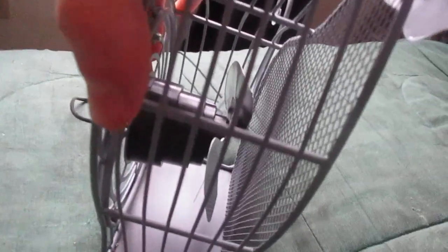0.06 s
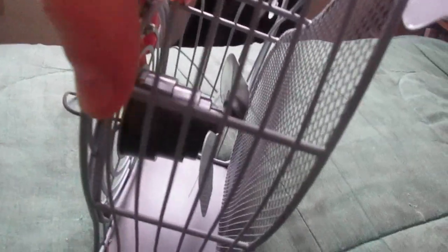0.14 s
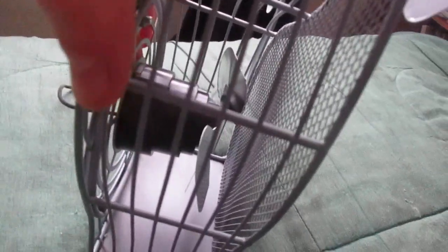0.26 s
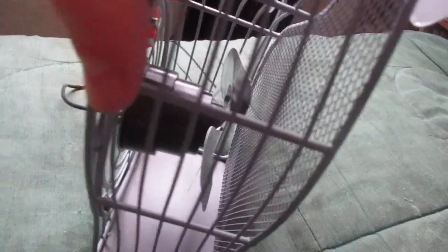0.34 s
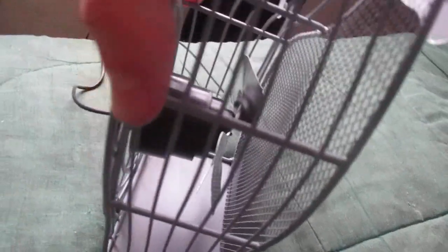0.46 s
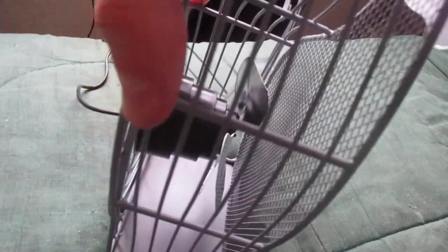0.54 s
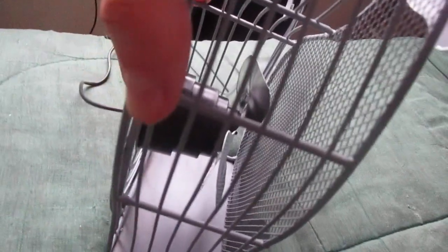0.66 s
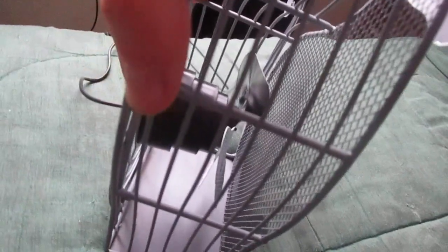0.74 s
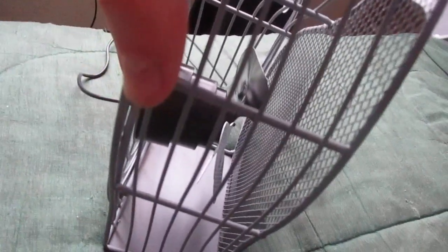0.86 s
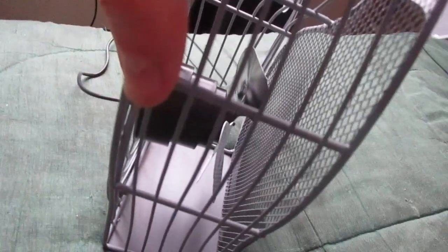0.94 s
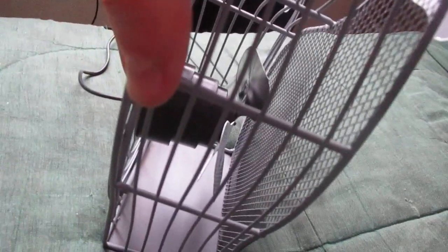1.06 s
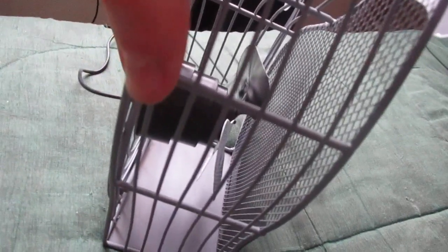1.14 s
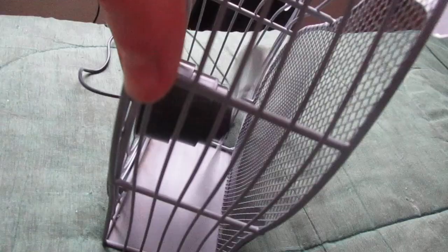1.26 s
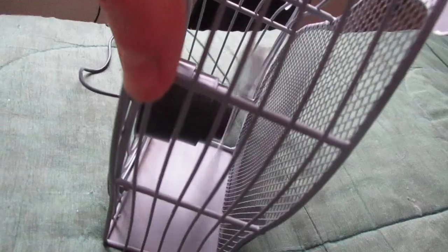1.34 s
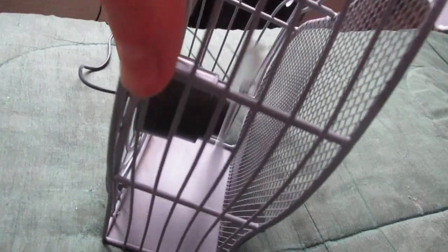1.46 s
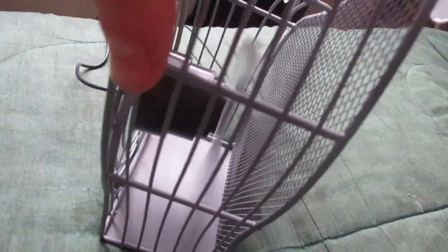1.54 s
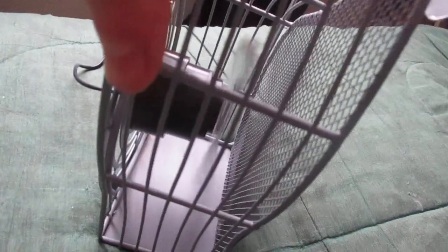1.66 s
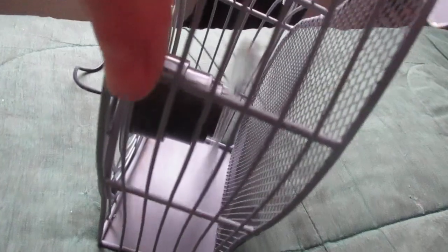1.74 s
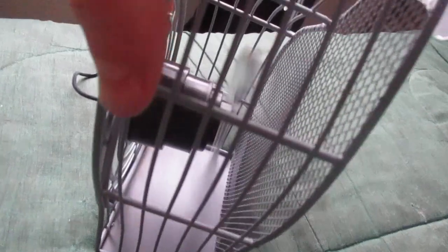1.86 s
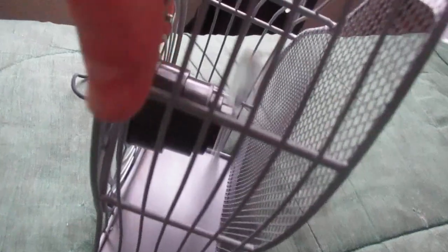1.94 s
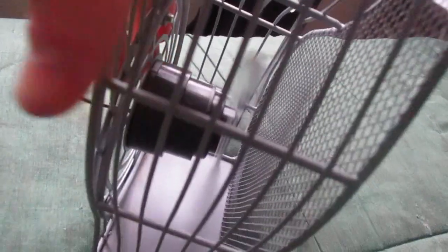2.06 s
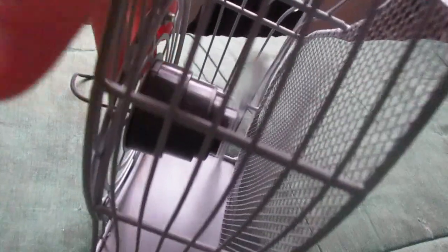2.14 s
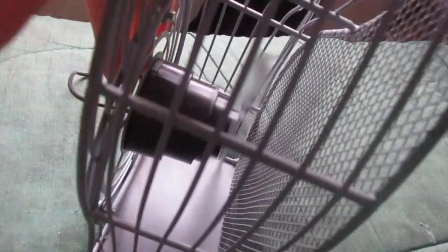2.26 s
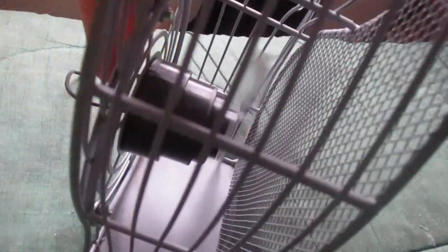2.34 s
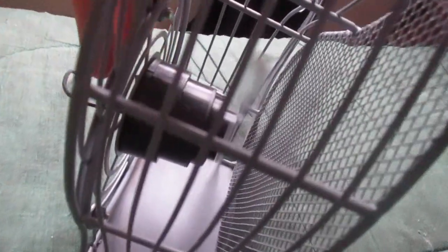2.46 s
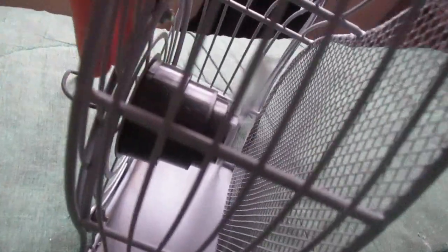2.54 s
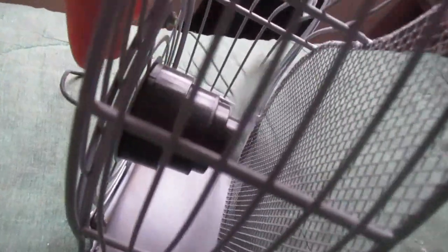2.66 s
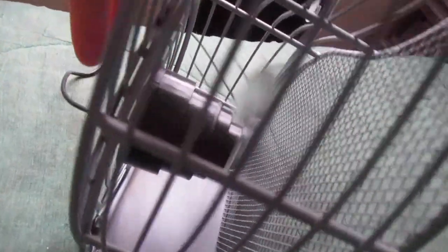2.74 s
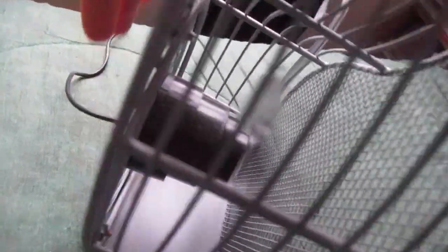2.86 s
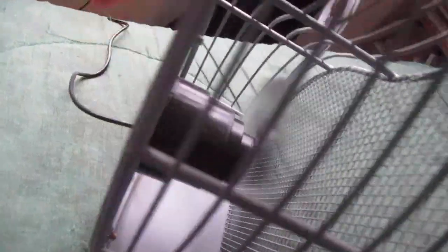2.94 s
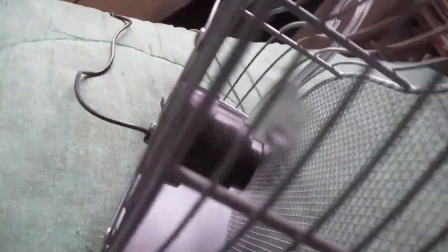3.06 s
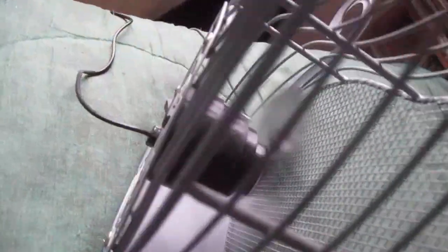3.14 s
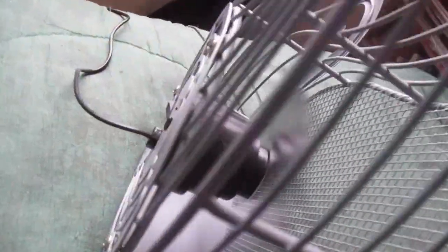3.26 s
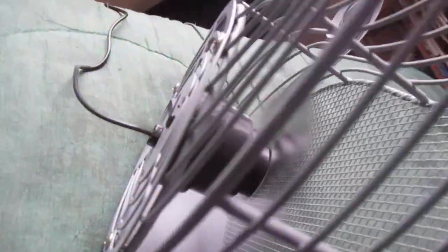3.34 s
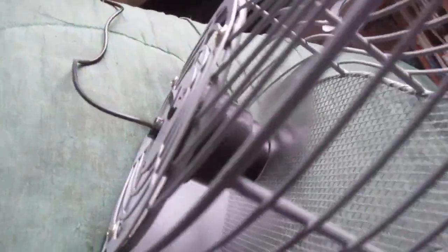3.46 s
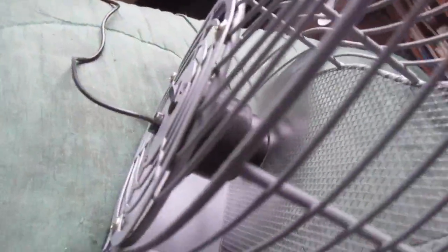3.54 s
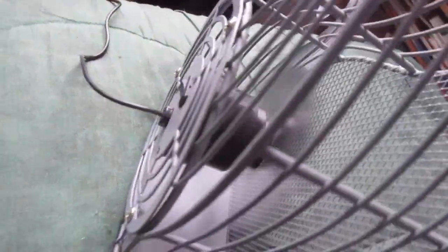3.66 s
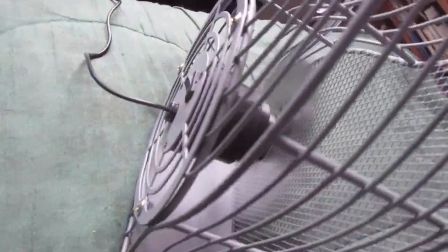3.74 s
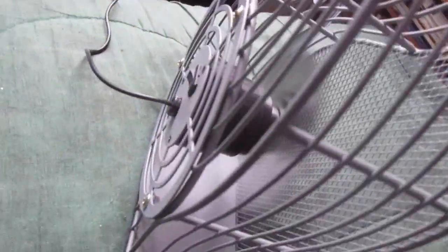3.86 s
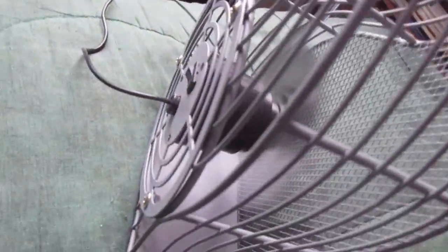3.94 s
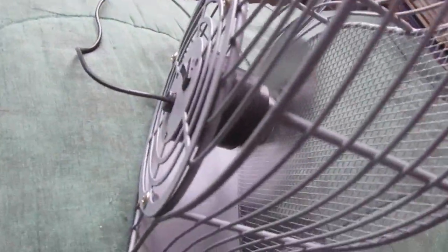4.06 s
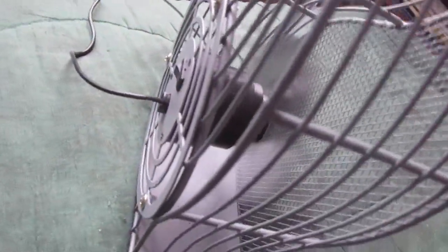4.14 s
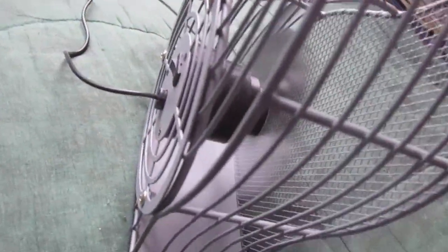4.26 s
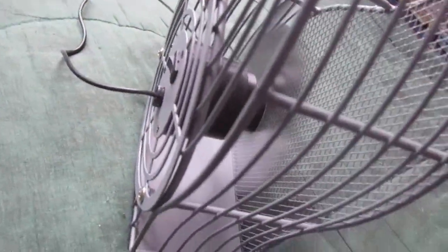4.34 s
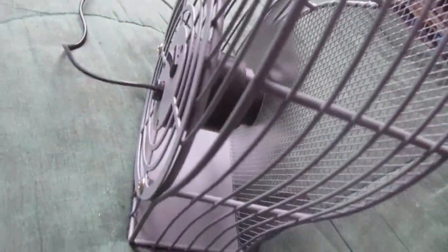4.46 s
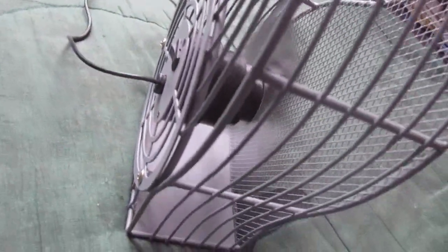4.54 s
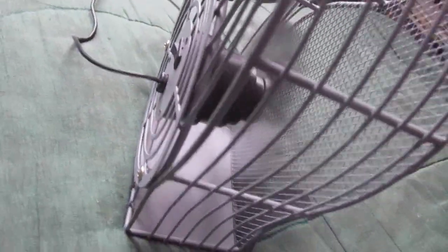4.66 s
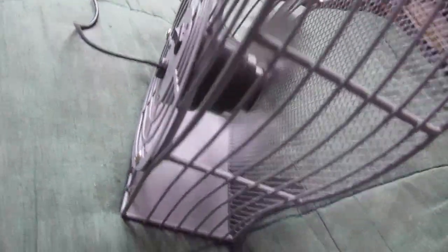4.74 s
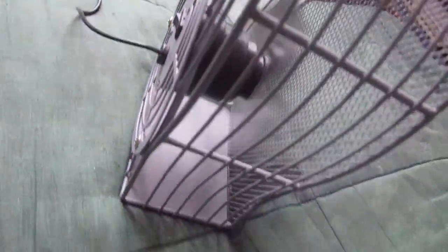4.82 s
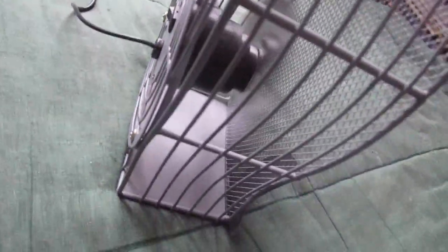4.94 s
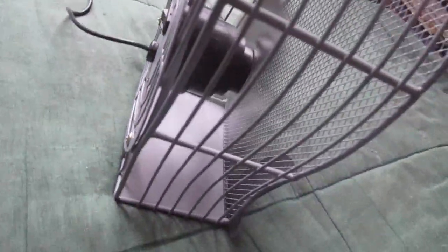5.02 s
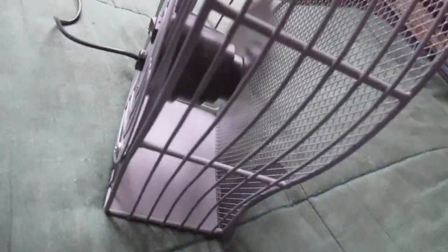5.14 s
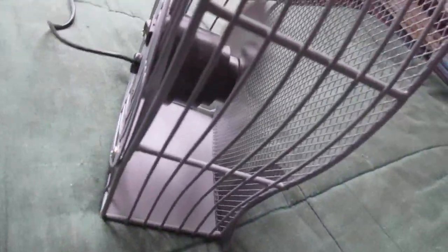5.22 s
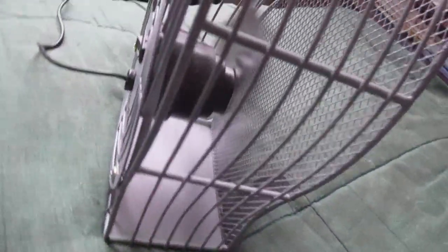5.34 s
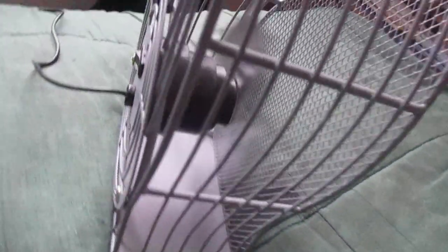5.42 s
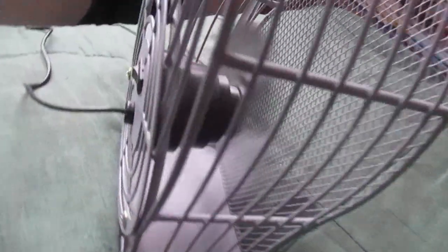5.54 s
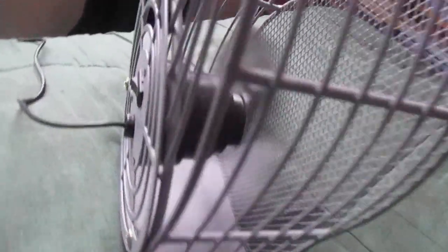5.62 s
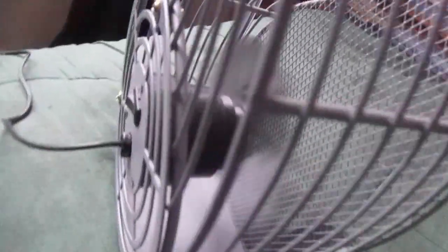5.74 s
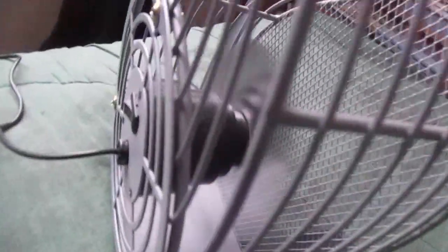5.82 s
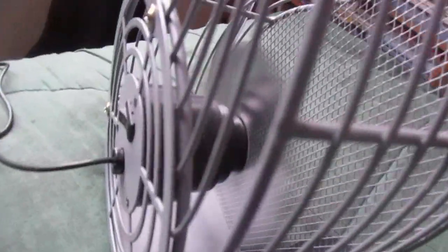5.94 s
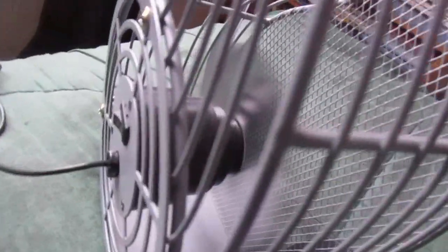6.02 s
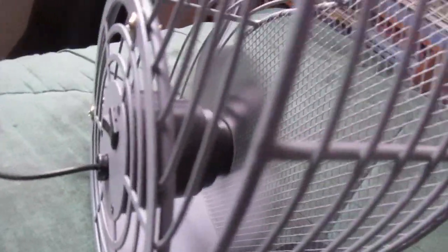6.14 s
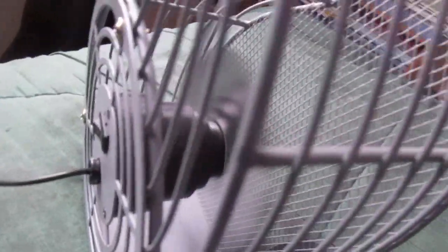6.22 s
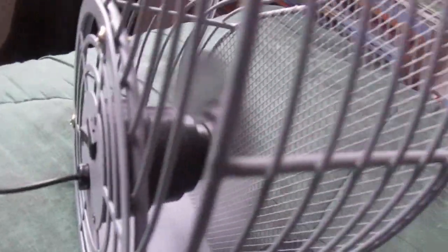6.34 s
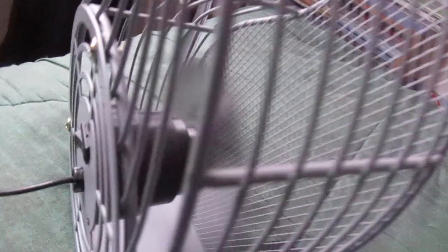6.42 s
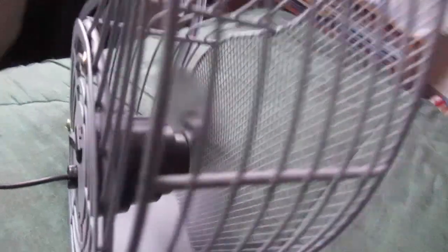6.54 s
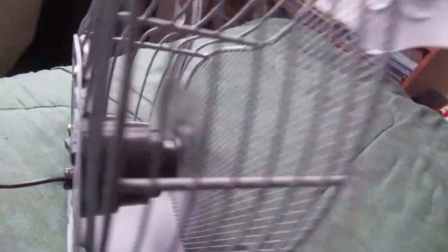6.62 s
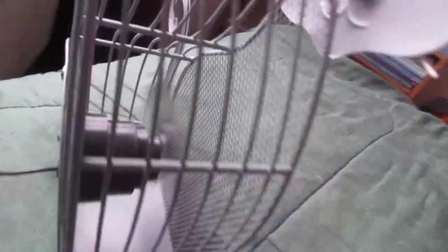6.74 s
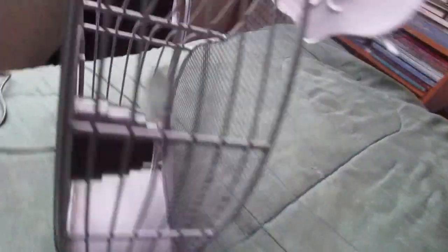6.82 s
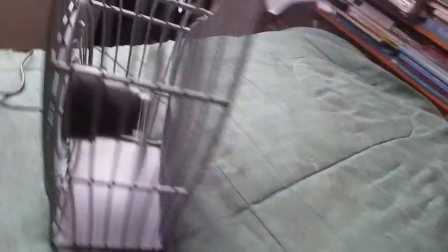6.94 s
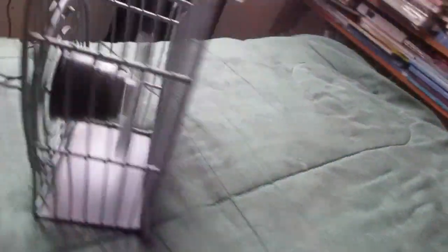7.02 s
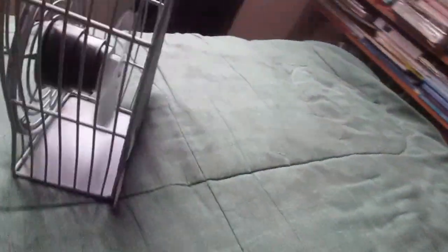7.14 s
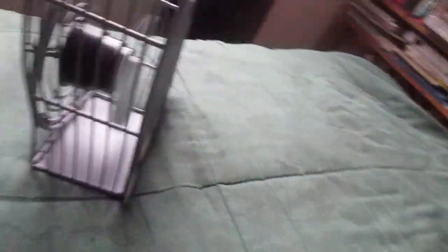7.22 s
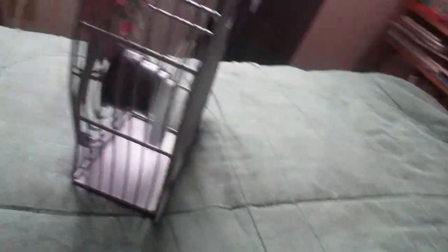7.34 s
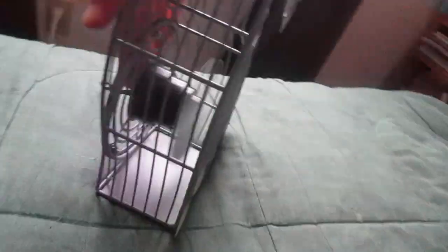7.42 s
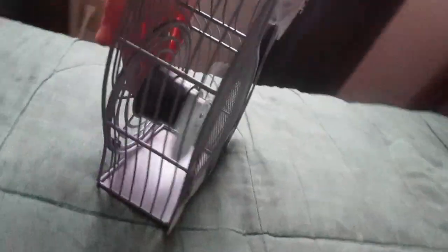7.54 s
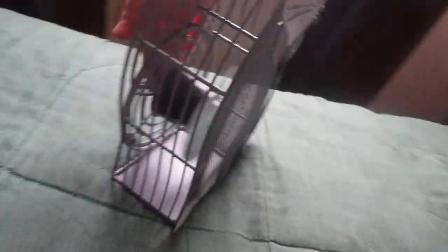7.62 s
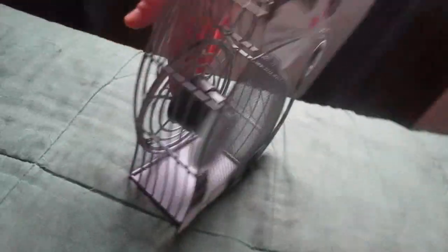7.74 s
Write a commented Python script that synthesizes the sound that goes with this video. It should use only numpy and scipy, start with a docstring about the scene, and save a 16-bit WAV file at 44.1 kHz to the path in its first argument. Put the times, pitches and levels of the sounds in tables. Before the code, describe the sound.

A sharp metallic switch snap rings a small wire fan cage, then the motor spins up quickly to a steady low hum and airy whir with light ticks.

```python
"""A small wire-cage desk fan stands on a quilt, close to the microphone, in a quiet room with a thin whistle.
First comes a light tick of handling: ringing modes for ticks, decaying sines for bumps, noise grains for rubs.
At 1.2 s the switch snaps and rings the cage, and the motor spins up: sines locked to the turn hum and whine,
shaped noise makes the air, a looped rough track the brush scratch, and the brushes squeak briefly near 2 s.
Rubs, ticks and a skid over the wires follow as the microphone moves round the fan, leans in and draws back."""
import sys
import numpy as np
from scipy import signal
from scipy.fft import rfft, irfft, next_fast_len
from scipy.io import wavfile
from scipy.ndimage import uniform_filter1d

SR = 44100
rng = np.random.default_rng(int(sys.argv[2]) if len(sys.argv) > 2 else 0)


def dump_mix(stems):
    """Bounce the given channels to the path in sys.argv[1] as a 16-bit WAV at rate SR."""
    frames = np.atleast_2d(stems).T  # one column per channel
    limited = np.clip(frames, -1, 1)  # hard clip at full scale
    pcm = np.round(limited * 32767).astype(np.int16)
    wavfile.write(sys.argv[1], SR, pcm)


N = 343539
TIME = np.arange(N) / SR
BINS = np.fft.rfftfreq(N, 1 / SR)
SWITCH_S = 1.1997
TOP_SPEED, SPIN_UP_S = 56.637, 0.487  # turns a second; time constant of the run-up


def gain_of(db):
    """Decibels to amplitude."""
    return 10 ** (np.asarray(db) / 20)


def evened(x):
    """Scales to rms 1."""
    return x / np.sqrt(np.mean(x ** 2) + 1e-20)


def read(points, hz):
    """Reads a table of values on a log-frequency axis."""
    f, value = np.transpose(points)
    return np.interp(np.log(hz + 1), np.log(f + 1), value)


def curve(rows):
    """A control curve at every sample."""
    return np.interp(TIME, *np.transpose(rows))


def add(mix, s, sound):
    """Mixes a sound in at time s."""
    part = mix[round(s * SR):][:len(sound)]
    part += sound[:len(part)]


def noise(colour):
    """Steady noise of a given spectrum, rms 1."""
    spectrum = rfft(rng.standard_normal(N))
    return evened(irfft(spectrum * gain_of(read(colour, BINS)), N))


def drift(rate_hz, step=16):
    """Smooth random wandering of about rms 1, made once every few samples and interpolated."""
    size = next_fast_len(N // step + 2)
    hz = np.fft.rfftfreq(size, step / SR)
    coarse = irfft(rfft(rng.standard_normal(size)) * np.exp(-(hz / rate_hz) ** 2), size)
    return np.interp(np.arange(N) / step, np.arange(size), evened(coarse))


def bell(hz, centre_hz, octaves):
    """A hump on the log-frequency axis."""
    return np.exp(-0.5 * (np.log2((hz + 1) / centre_hz) / octaves) ** 2)


# colour of the room noise: [f/Hz, relative level per Hz/dB]
ROOM_COLOUR = [(20, -7), (60, -1.5), (150, -3), (350, -8.5), (700, -18.5), (1300, -17.5), (2300, -19),
               (4000, -23.5), (7000, -22.5), (10000, -26.5), (13000, -30.5), (16000, -40)]


def room(floor_db=-55, hum_hz=118, hum_db=-67):
    """Quiet, steady room noise with a faint low hum."""
    low_hum = np.sqrt(2) * gain_of(hum_db) * np.sin(2 * np.pi * hum_hz * TIME)
    return gain_of(floor_db) * noise(ROOM_COLOUR) + low_hum


def whistle(db=-62.5, hz=7867, slips_per_s=30):
    """A thin electronic whistle whose phase slips half a cycle thirty times a second."""
    slips = uniform_filter1d(np.floor(slips_per_s * TIME), 120)  # each slip is eased over 120 samples
    cycles = hz * TIME + slips / 2
    return np.sqrt(2) * gain_of(db) * np.sin(2 * np.pi * cycles)


# modes a tick rings with: [f/Hz, relative level/dB, t60/s]
TICK_MODES = [(1930, -0.5, 0.0044), (2420, -0.5, 0.0056), (3380, 0, 0.0031), (3640, -0.5, 0.0069),
              (4460, 2.5, 0.0053), (5750, 4, 0.0024), (6300, 2.5, .004), (8020, 0, 0.0033),
              (9450, -3.5, 0.0031), (12000, -7, .003), (14400, -9, 0.0027)]


def tick(db, centre_hz, octaves, dull_hz, dull_db=-12, dull_octaves=0.1):
    """A dry tap that stirs the modes round its centre, save those with a node at the spot."""
    t = np.arange(SR // 20) / SR
    ring = np.zeros(len(t))
    for k, (hz, mode_db, t60) in enumerate(TICK_MODES):
        level_db = mode_db + dull_db * bell(hz, dull_hz, dull_octaves)
        stirred = bell(hz, centre_hz, octaves) * gain_of(level_db)
        sign = (-1) ** k
        ring += sign * stirred * gain_of(-60 * t / t60) * np.sin(2 * np.pi * hz * t)
    return gain_of(db) * ring / abs(ring).max()


# light ticks, each on a spot of the cage that leaves one pitch dull:
# [t/s, peak level/dB, centre f/Hz, spread/octaves, dull f/Hz]
TICKS = [(0.407, -41, 1920, 0.45, 4000), (2.543, -36, 6500, 0.63, 4500), (3.387, -35, 8500, 0.51, 6000),
         (4.3092, -8, 5900, 0.88, 6170), (4.6963, -13, 6600, 0.72, 4550), (5.0757, -10.5, 2500, 1.25, 7800),
         (5.5272, -20.5, 5400, 0.67, 7250), (5.922, -34, 8000, 0.45, 4500)]
# soft bumps, level as the decay starts: [t/s, level/dB, f/Hz, t60/s]
BUMPS = [(1.163, -38, 269, 0.02), (1.345, -33.5, 227, 0.014), (5.0758, -20, 110, 0.025),
         (5.076, -27, 478, 0.0082), (5.245, -28, 110, 0.045), (6.879, -31, 125, 0.045),
         (6.899, -27.5, 127, 0.048), (7.425, -34, 90, 0.04), (7.449, -29, 260, 0.025)]
# rubs, level before the fades: [t/s, length/s, rms level/dB, centre f/Hz, spread/octaves]
RUBS = [(3.958, 0.07, -43.5, 5470, 0.55), (4.31, 0.11, -49.5, 9700, 0.14), (4.97, 0.15, -52, 8350, 0.22),
        (6.485, 0.13, -55, 6000, 0.18), (7.676, 0.092, -49, 8400, 0.42)]


def handling(grain_db=5, bump_attack_s=0.00034):
    """Dry ticks, damped sine bumps and rubs of grainy band noise."""
    out = np.zeros(N)
    for s, db, centre_hz, octaves, dull_hz in TICKS:
        add(out, s, tick(db, centre_hz, octaves, dull_hz))

    t = np.arange(SR // 5) / SR
    for s, db, hz, t60 in BUMPS:
        attack = 1 - np.exp(-t / bump_attack_s)
        add(out, s, gain_of(db - 60 * t / t60) * -np.sin(2 * np.pi * hz * t) * attack)

    for s, length, db, centre_hz, octaves in RUBS:
        grains = rng.standard_normal(SR) * gain_of(grain_db * drift(160)[:SR])
        colour = bell(np.fft.rfftfreq(SR, 1 / SR), centre_hz, octaves)
        rub = evened(irfft(rfft(grains) * colour, SR)[:round(length * SR)])
        add(out, s, gain_of(db) * rub * signal.windows.tukey(len(rub), 0.7))
    return out


# free ringing of the wire cage: [f/Hz, relative level/dB, t60/s]
CAGE_MODES = [(1536, -23, 0.52), (2200, -27, 0.58), (2358, -9, 0.28), (2644, -21, 0.65), (3700, -16, 0.33),
              (3520, -15, 0.21), (3800, -7, 0.23), (3910, -3, 0.19), (4452, -6, 0.22), (4780, 4.5, 0.18),
              (4990, -19, 0.17), (5560, -15, 0.15), (5900, 0.5, 0.14), (6330, -5, 0.17), (6600, -23, 0.28),
              (6982, -4, 0.12), (7200, 0, 0.18), (7470, 11.5, 0.087), (7800, -3, 0.14), (8500, -12, 0.056),
              (9227, -8, 0.1), (9560, -9, 0.12), (10300, -22, 0.14), (11560, 0.5, 0.06)]
# colour of the dense shimmer of the wires: [f/Hz, relative level per Hz/dB]
SHIMMER_COLOUR = [(200, -13), (500, -5), (900, -18), (1500, -7), (2300, 0.5), (3800, 6.5), (5200, 7.5),
                  (7500, 1.5), (9000, -2), (13000, -3), (16000, -27)]
# how quickly that shimmer dies: [f/Hz, t60/s]
SHIMMER_T60 = [(500, 0.11), (2400, 0.2), (7000, 0.15), (14000, 0.094)]


def switch(snap_db=1, snap_hz=6300, snap_s=0.00018, crack_db=-13, crack_s=0.00094, ring_db=-27, shimmer_db=-22):
    """The toggle snaps over with a short crack; the cage rings on in single modes and dense shimmer."""
    t = np.arange(SR) / SR
    snap_shape = t / snap_s * np.exp(1 - t / snap_s)
    snap = gain_of(snap_db) * snap_shape * np.sin(2 * np.pi * snap_hz * t)

    crack = gain_of(crack_db) * rng.standard_normal(SR) * np.exp(-t / crack_s)
    crack = signal.lfilter(*signal.butter(2, 1300, "high", fs=SR), crack)

    ring = np.zeros(SR)
    for hz, db, t60 in CAGE_MODES:
        decay = gain_of(ring_db + db - 60 * t / t60)
        ring += decay * np.sin(2 * np.pi * (hz * t + rng.random()))

    # each band of the shimmer decays at its own rate
    hz, when, bands = signal.stft(noise(SHIMMER_COLOUR)[:SR], SR, nperseg=256)
    dying = gain_of(shimmer_db - 60 * when / read(SHIMMER_T60, hz)[:, None])
    shimmer = signal.istft(bands * dying, SR, nperseg=256)[1][:SR]

    spreading = 1 - np.exp(-t / 0.00031)  # the blow takes a moment to spread through the wires
    out = np.zeros(N)
    add(out, SWITCH_S, snap + crack + (ring + shimmer) * spreading)
    return out


def rotor(unsteady=0.00019):
    """Torque falls as the speed rises, so the shaft nears its top speed (turns a second) exponentially."""
    since = np.maximum(TIME - SWITCH_S, 0)
    speed = TOP_SPEED * (1 - np.exp(-since / SPIN_UP_S)) * (1 + unsteady * drift(2.53))
    turns = np.cumsum(speed) / SR
    return speed, turns


# the microphone drifts round the fan, leans in, then draws back: [t/s, nearness as a level/dB]
NEARNESS = [(3.0, -35.5), (3.39, -36), (5.37, -37), (6.05, -34.5), (6.35, -35.5), (6.82, -42.5), (7.7, -45)]
USUAL_DB = -37  # nearness at the usual distance


def loudness(speed, db, power, near_share):
    """Each sound of the fan grows as a power of the speed and takes its own share of the nearness."""
    nearness_db = near_share * (curve(NEARNESS) - USUAL_DB)
    return gain_of(db + nearness_db) * (speed / TOP_SPEED) ** power


# overtones of the turn: [multiple of the turn, relative level/dB]
TURN_OVERTONES = [(2, -3.5), (3, 3), (5, -9.5), (6, -7.5), (7, -22), (8, -8.5), (9, -16.5), (11, -17.5)]
# four-blade passing tone, which varies with the side the microphone is on: [t/s, relative level/dB]
BLADE_TONE = [(2.7, -48), (3.3, -57), (3.95, -45.5), (4.65, -45), (5.4, -53.5), (6.0, -50), (6.9, -60),
              (7.6, -56)]


def hum(speed, turns, waver_db=2.6, lag=0.26, dead_hz=149, dead_db=-13, dead_octaves=0.085,
        blade_db=2.5, blade_power=7):
    """The unbalanced rotor shakes the frame once a turn; overtones waver as the blades meet uneven air."""
    angle = 2 * np.pi * turns
    overtones = np.zeros(N)
    for order, db in TURN_OVERTONES:
        level_db = db + waver_db * drift(3.0)
        # a dead spot between two frame resonances
        level_db += dead_db * bell(order * speed, dead_hz, dead_octaves)
        overtones += gain_of(level_db) * np.sin(order * (angle - lag))

    shake = np.sin(angle) * loudness(speed, db=-34.0, power=5.7, near_share=1.04)
    blades = np.sin(4 * (angle - lag)) * gain_of(curve(BLADE_TONE) + blade_db)
    blades *= (speed / TOP_SPEED) ** blade_power
    return shake + blades + overtones * loudness(speed, db=-45.5, power=12.7, near_share=1.22)


# resonances of the frame that the motor's orders sweep through: [f/Hz, width/Hz, relative level/dB]
FRAME_MODES = [(98, 8.8, -47.5), (607, 37, -59.5), (1540, 200, -65), (1760, 320, -61.5), (2166, 150, -65)]


def whine(speed, turns, waver_db=2.5, settled_db=-17, steady_db=-62.0):
    """Two magnet poles and six commutations a turn shake the frame, hardest late in the run-up."""
    sweep = np.zeros(N)
    for order in [2, 12, 18, 30, 36, 42, 48, 54]:  # cycles a turn
        response = np.zeros(N)
        for hz, width, db in FRAME_MODES:
            response += gain_of(db) / (1 + (2 * (order * speed - hz) / width) ** 2)
        tone = np.sin(2 * np.pi * (order * turns + rng.random()))
        sweep += response * gain_of(waver_db * drift(4.5)) * tone

    pace = speed / TOP_SPEED
    settling = gain_of(settled_db * pace ** 40)  # the sweep sinks as full speed is reached
    # one thin note stays
    note = np.sin(2 * np.pi * 12 * turns) * pace ** 12
    return 2 * sweep * pace ** 3 * settling + note * gain_of(steady_db + waver_db * drift(3.3))


def cage_song(speed, db=-66, width_hz=14, settled_db=-4, count=4):
    """The motor's vibration keeps the lowest cage modes faintly ringing, as noise in narrow bands."""
    response = np.zeros(len(BINS))
    for hz, mode_db, _ in CAGE_MODES[:count]:
        response += gain_of(mode_db / 2) / (1 + (2 * (BINS - hz) / width_hz) ** 2)
    song = evened(irfft(rfft(rng.standard_normal(N)) * response, N))
    pace = speed / TOP_SPEED
    return song * pace ** 2 * gain_of(db + settled_db * pace ** 24)


# colour of the low buffeting: [f/Hz, relative level per Hz/dB]
BUFFET_COLOUR = [(20, -18), (60, 2), (110, 1), (250, 2.5), (420, -0.5), (650, -8.5), (1000, -31),
                 (3000, -49)]
# colour of the rush of air through the grille: [f/Hz, relative level per Hz/dB]
RUSH_COLOUR = [(100, -10), (600, -3), (1100, 0), (1700, 1), (2500, 1), (3200, -2), (4000, -2), (6300, -6),
               (8500, -13), (11000, -16), (13000, -23), (16000, -28)]


def air(speed, turns, buffet_depth=0.65, rush_depth=0.13, flutter_db=0.8):
    """Low buffeting and a wide rush, both pulsing with the turn; the rush carries farther."""
    pulse = np.cos(2 * np.pi * (turns - 0.1))
    buffet = noise(BUFFET_COLOUR) * (1 + buffet_depth * pulse)
    rush = noise(RUSH_COLOUR) * (1 + rush_depth * pulse) * gain_of(flutter_db * drift(18))
    buffet *= loudness(speed, db=-52.5, power=5.6, near_share=0.45)
    rush *= loudness(speed, db=-51.5, power=3.9, near_share=0.25)
    return buffet + rush


# how the motor housing radiates the brush scratch: [f/Hz, relative level per Hz/dB]
HOUSING = [(500, -15), (1300, 2.5), (2600, -4), (4000, 1), (6000, -2), (7500, -5.5), (8700, 2),
           (10000, -1.5), (11000, 6), (12200, -3), (13300, -0.5), (14100, 9), (14700, -1.5), (15800, -6)]


def brushes(speed, turns, wear_hz=0.078, size=8192):
    """Brushes ride one rough track every turn: a comb of lines climbing through the housing resonances."""
    ripples = np.arange(size // 2 + 1)  # ripples a turn
    # the width of a brush smooths away the finest ripples of the track
    smoothing = 0.25 * (ripples < 400) + 0.75 / np.sqrt(1 + (ripples / 256) ** 40)
    tracks = irfft(rfft(rng.standard_normal((2, size))) * smoothing)
    place = np.arange(size) / size
    first, second = (np.interp(turns, place, track, period=1) for track in tracks)

    shift = 2 * np.pi * wear_hz * TIME  # the contact creeps between two tracks
    contact = first * np.cos(shift) + second * np.sin(shift)
    # the pressure swings with the six commutations and once a turn
    pressure = 1 + 0.3 * np.cos(2 * np.pi * 6 * turns) + 0.3 * np.cos(2 * np.pi * turns)
    radiated = evened(irfft(rfft(contact * pressure) * gain_of(read(HOUSING, BINS)), N))
    return radiated * loudness(speed, db=-54.2, power=3.3, near_share=0.7)


def squeak(turns, db=-60, width_hz=260, ripples=249, peak_s=2.03, swell_s=0.085):
    """The brushes sing briefly during the run-up: a noisy band centred on 249 ripples a turn."""
    angle = 2 * np.pi * ripples * turns
    swell = np.exp(-((TIME - peak_s) / swell_s) ** 2)
    band = drift(width_hz) * np.cos(angle) + drift(width_hz) * np.sin(angle)
    return gain_of(db) * band * swell


SKID_S, SKID_STEP_S, SKID_FADE_DB_PER_S = 4.3348, 0.0086, 65


def skid(db=-31.5, centre_hz=6000, octaves=1.0, dull_hz=7000, count=9):
    """After the loudest tick something skids over the wires: dying small ticks, uneven in level and spacing."""
    out = np.zeros(N)
    chances = rng.uniform(-1, 1, (count, 2)) * [0.2, 5]  # steps late, dB uneven
    for k, (late_steps, uneven_db) in enumerate(chances):
        since = (k + late_steps) * SKID_STEP_S
        level_db = db - SKID_FADE_DB_PER_S * since + uneven_db
        add(out, SKID_S + since, tick(level_db, centre_hz, octaves, dull_hz))
    return out


def scene():
    """The rotor's turning drives the running fan; the switch, handling, skid and room lie round it."""
    surroundings = room() + whistle() + handling() + switch()
    speed, turns = rotor()
    fan = hum(speed, turns) + whine(speed, turns) + cage_song(speed)
    fan += air(speed, turns) + brushes(speed, turns) + squeak(turns)
    return (surroundings + fan + skid())[None]


# hollows in the microphone's response: [f/Hz, width/Hz, depth/dB]
MIC_DIPS = [(800, 77, 13), (4787, 1760, 16)]
EDGE_HZ = 15750  # top of the microphone's band


def record(dry):
    """The microphone's two hollows, each cut by subtracting a resonant band, then the band limit."""
    for hz, width, depth_db in MIC_DIPS:
        band = signal.lfilter(*signal.iirpeak(hz, hz / width, fs=SR), dry)
        dry = dry - (1 - gain_of(-depth_db)) * band
    low_pass = signal.firwin(255, EDGE_HZ, window=("kaiser", 9), fs=SR)
    return signal.oaconvolve(dry, low_pass[None], "same")


dry = scene()
out = record(dry)
dump_mix(out)
```